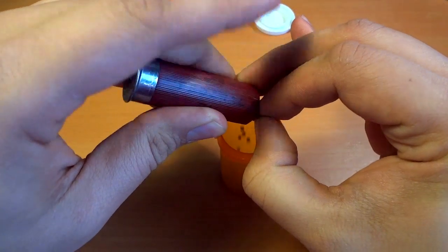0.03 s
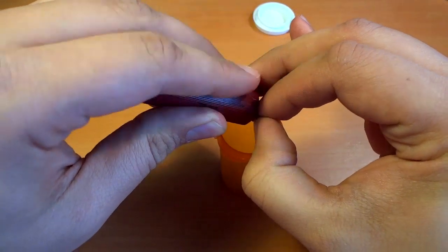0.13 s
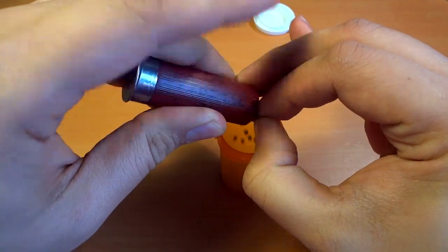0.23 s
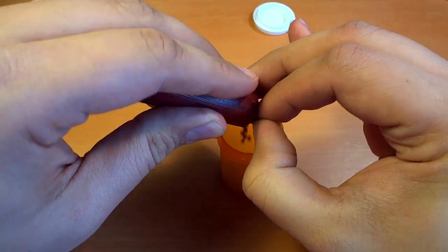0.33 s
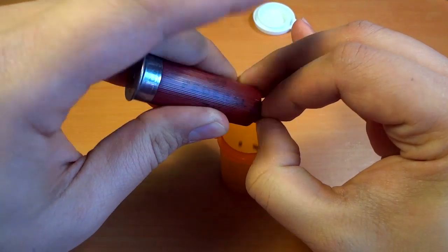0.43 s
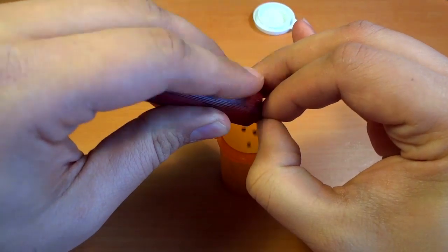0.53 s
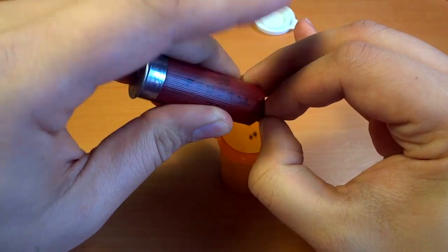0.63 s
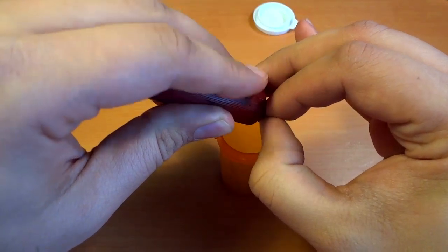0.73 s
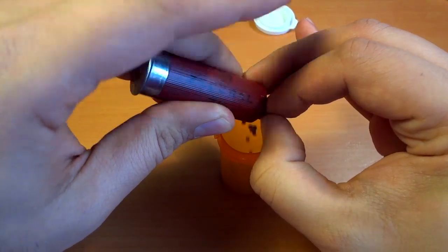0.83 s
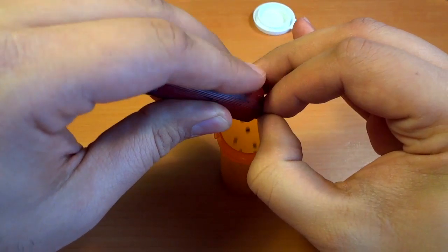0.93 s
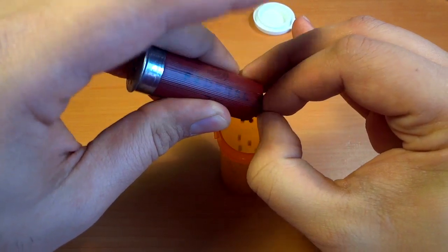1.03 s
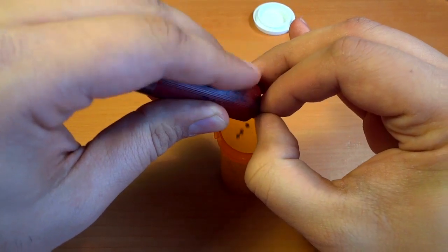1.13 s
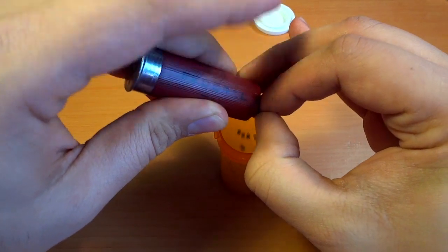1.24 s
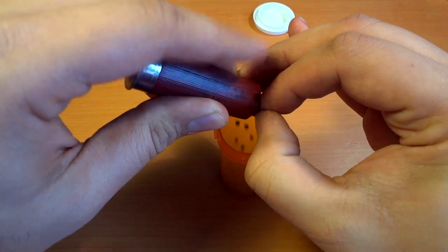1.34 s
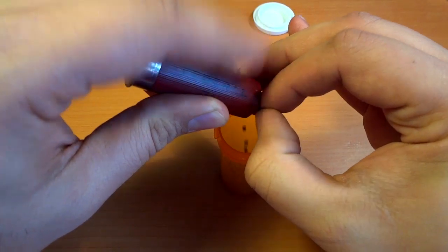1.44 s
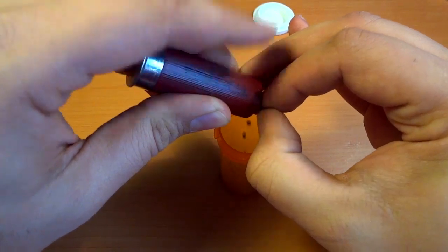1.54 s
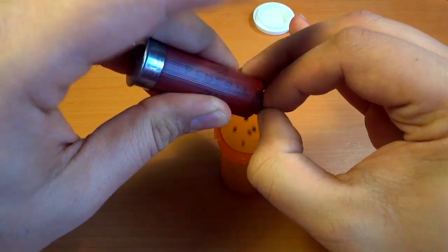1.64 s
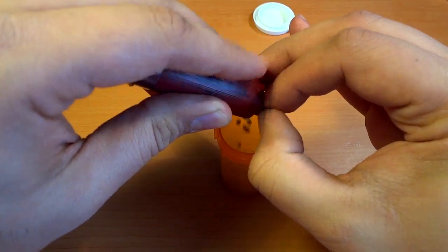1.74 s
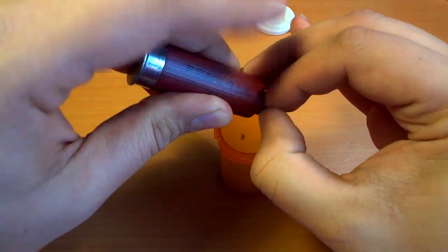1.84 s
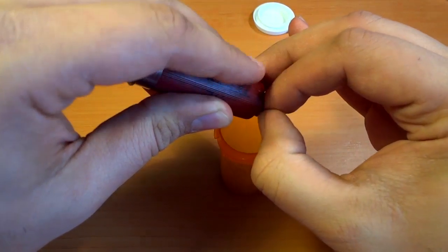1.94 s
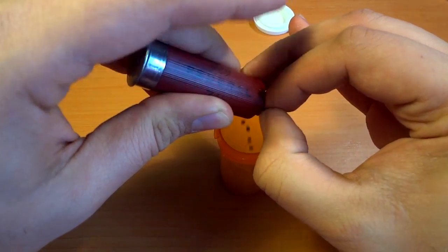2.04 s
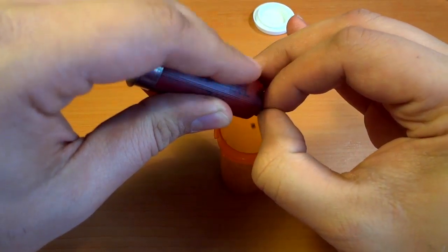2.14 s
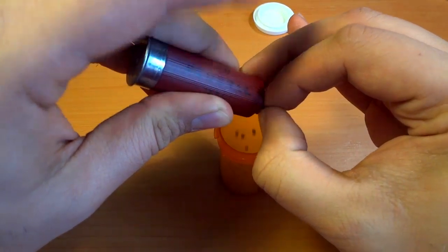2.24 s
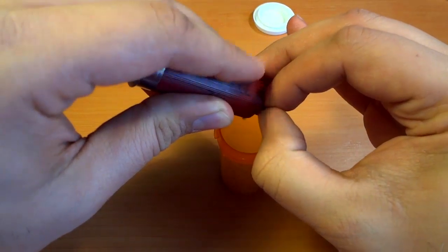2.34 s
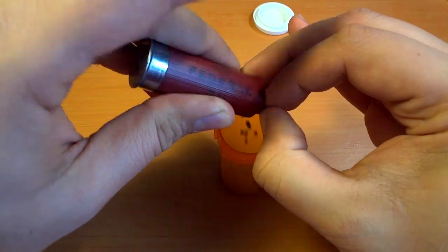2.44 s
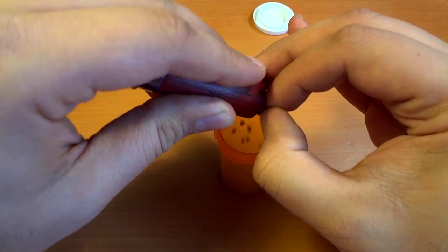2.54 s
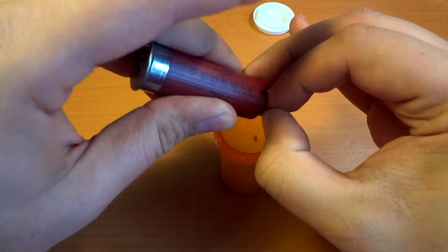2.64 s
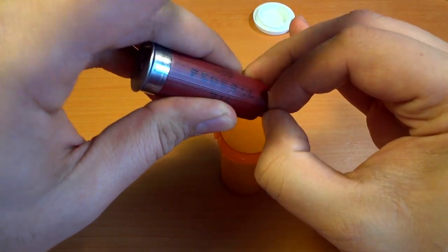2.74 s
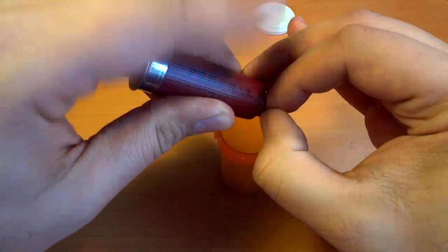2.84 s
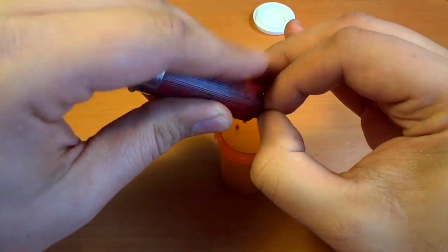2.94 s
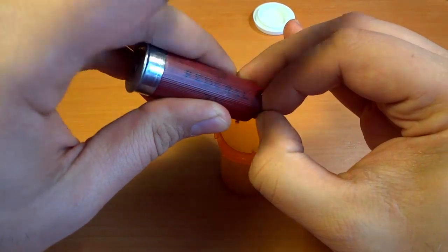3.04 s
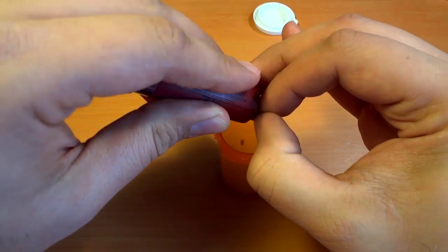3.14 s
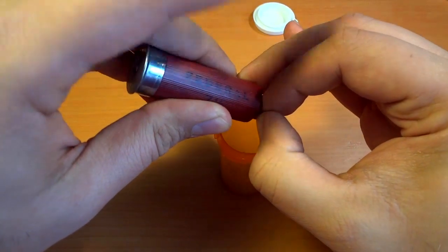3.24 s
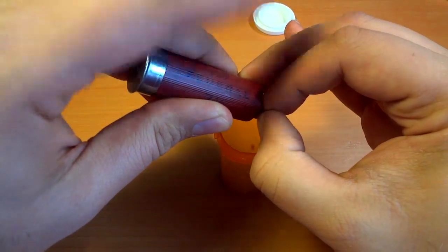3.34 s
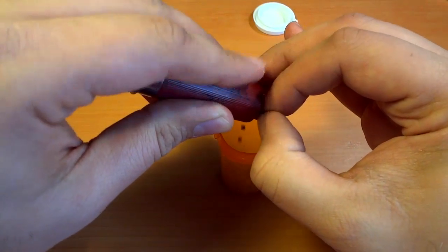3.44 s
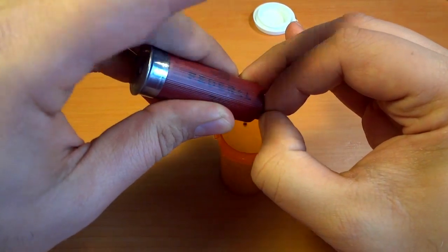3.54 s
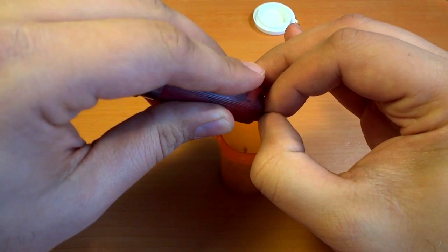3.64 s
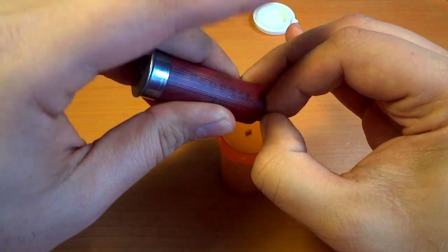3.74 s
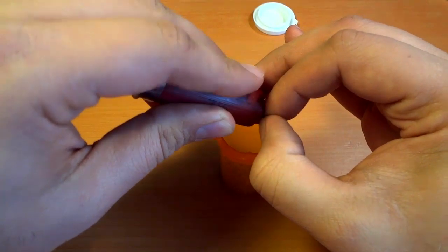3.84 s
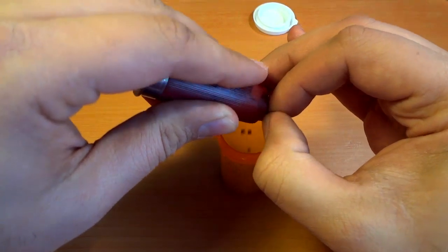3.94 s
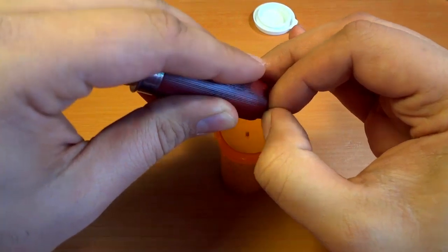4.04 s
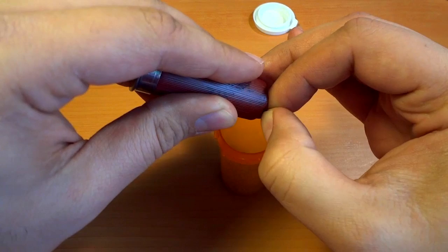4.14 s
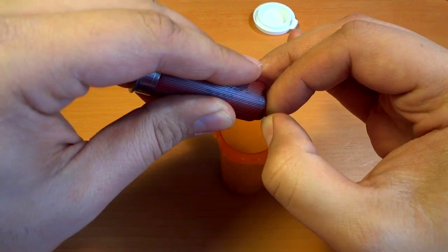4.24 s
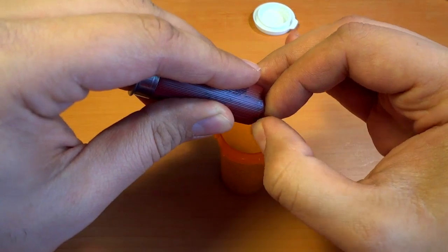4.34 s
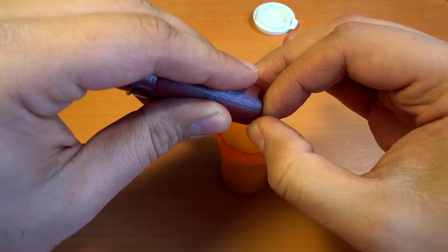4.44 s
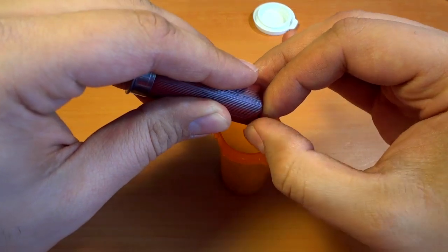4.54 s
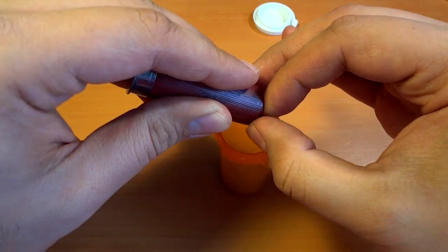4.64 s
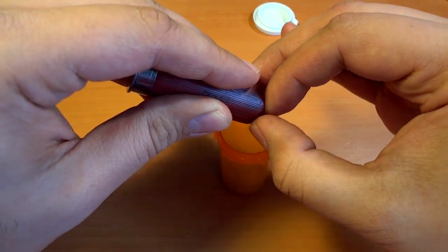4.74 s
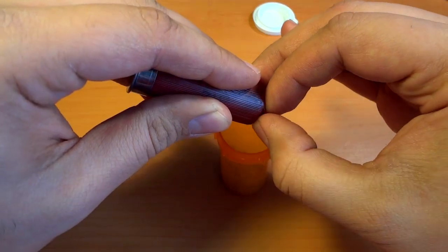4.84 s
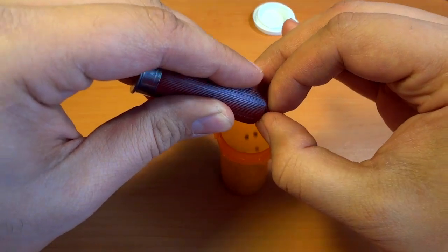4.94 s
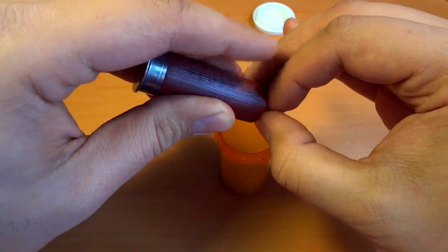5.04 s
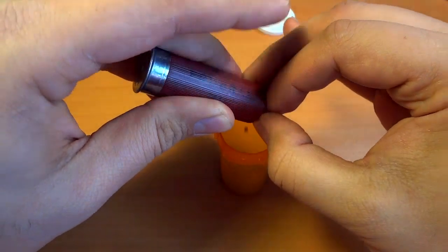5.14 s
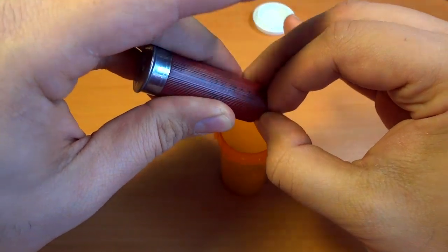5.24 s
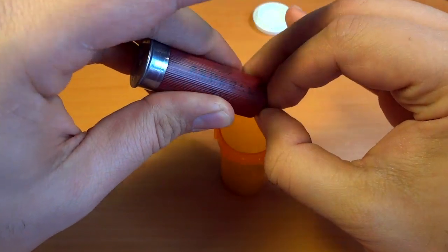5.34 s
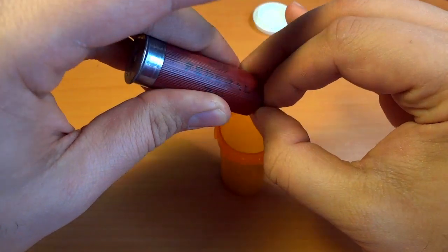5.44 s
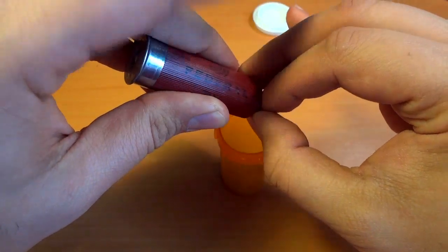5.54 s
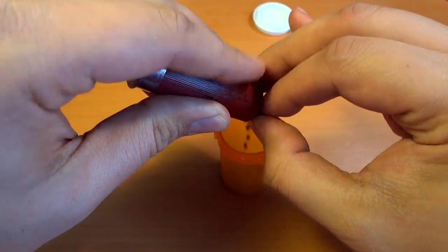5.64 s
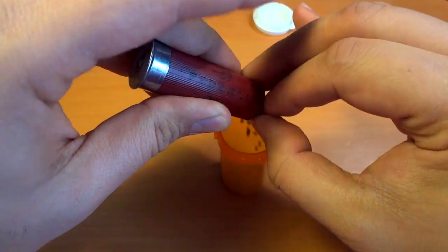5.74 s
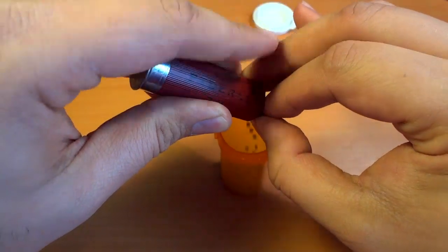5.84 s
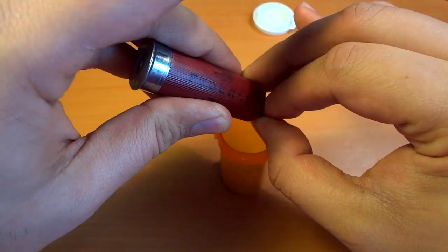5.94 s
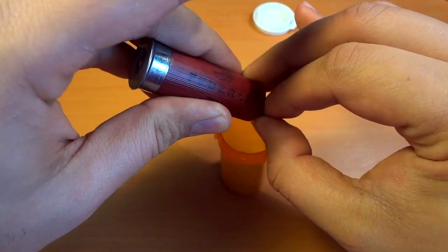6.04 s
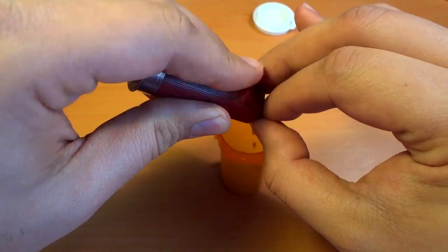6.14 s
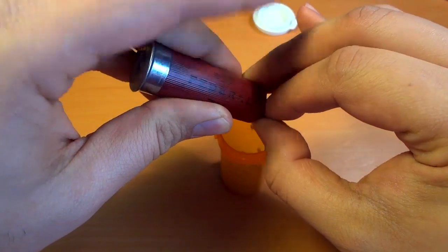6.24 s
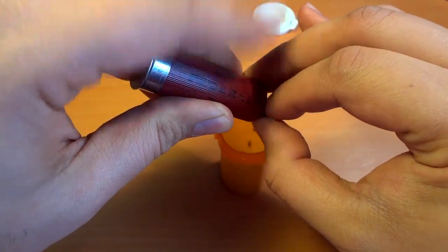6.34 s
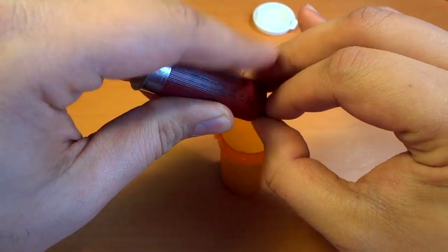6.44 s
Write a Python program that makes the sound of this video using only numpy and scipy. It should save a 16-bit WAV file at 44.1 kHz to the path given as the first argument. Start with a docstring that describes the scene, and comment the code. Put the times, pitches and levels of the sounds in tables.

```python
"""Lead shot pours out of a cut-open shotgun shell into a small plastic bottle, close to the microphone.
Each pellet is an impact: a click and a dying chain of contacts, filtered by the wall and bottom, then hops.
The bottle's air column rings with every landing, and the heap stiffens and damps the bottom as it grows.
A dense stream gives way to spurts and stray pellets; finger taps make the shot jump inside the shell.
Sparse decaying reflections form a small room, over low rumble and microphone hiss."""
import sys
import numpy as np
from scipy import signal
from scipy.fft import rfft, irfft
from scipy.io import wavfile

SR = 44100
rng = np.random.default_rng(int(sys.argv[2]) if len(sys.argv) > 2 else 0)


def generate_wav(sig):
    """Save sig (samples, or channels by samples) to the path in sys.argv[1] as 16-bit PCM at SR."""
    pcm = np.round(np.clip(np.atleast_2d(sig).T, -1, 1) * 32767).astype(np.int16)
    wavfile.write(sys.argv[1], SR, pcm)


N = 286209  # length in samples
SIZE = 2048  # length of a click or filter in samples


def amp(db):
    """Level law: decibels to amplitude gain."""
    return 10 ** (np.asarray(db) / 20)


def read(points, hz):
    """Interpolation: joins table points by straight lines on a log-frequency axis."""
    f, value = np.transpose(points)
    return np.interp(np.log(hz + 1), np.log(f), value)


def add(mix, s, sound):
    """Superposition: adds a sound to the mix at time s, cut off at the end."""
    start = max(round(s * SR), 0)
    part = mix[..., start:][..., :sound.shape[-1]]
    part += sound[..., :part.shape[-1]]


def causal(db):
    """Minimum phase: folding the cepstrum gives the promptest filters with these gains, as spectra."""
    cepstrum = irfft(np.log(amp(db)))
    cepstrum[..., 1:SIZE // 2] *= 2
    cepstrum[..., SIZE // 2 + 1:] = 0
    return np.exp(rfft(cepstrum))


def mode(hz, t60, db):
    """Free damped vibration: a sine that falls 60 dB in t60 seconds."""
    t = np.arange(SR // 3) / SR
    return amp(db - 60 * t / t60) * np.sin(2 * np.pi * hz * t)


def rung(modes):
    """Modal superposition: a struck body sounds as the sum of its damped modes."""
    return sum(mode(*row) for row in modes)


def clicks(colour_db, rattle_s, contacts_per_s, first, blur):
    """Impact chain: each row is a first contact and a dying run of random ones, filtered by its colour."""
    t = np.arange(SIZE) / SR
    shape = (len(colour_db), SIZE)
    contacts = rng.random(shape) < contacts_per_s / SR
    chain = rng.standard_normal(shape) * (blur + contacts) * np.exp(-t / rattle_s)
    chain[:, 0] = first
    sound = irfft(rfft(chain) * causal(colour_db))
    energy = (sound ** 2).sum(1, keepdims=True)
    return sound / np.sqrt(energy / (0.005 * SR))  # 0 dB if the energy is spread over 5 ms


def place(times, gains, sounds, spread):
    """Intensity stereo: lays sounds out in time, each with a random level difference between the sides."""
    mix = np.zeros((2, N))
    sides = spread * rng.standard_normal(len(times))
    for s, gain, sound, side in zip(times, gains, sounds, sides):
        add(mix, s, gain * np.outer([1 + side, 1 - side], sound))
    return mix


# Pellets leave in single file: timing scatter in shares of one gap, and strength scatter.
UNEVEN, SCATTER_DB = 0.3, 2.5


def trickle(runs):
    """Jittered pulse train: pellets follow one another unevenly while their level drifts along each run."""
    times, levels = [], []
    for start, length, number, db, change_db in runs:
        count = max(round(number), 1)
        late, force = rng.standard_normal((count, 2)).T
        along = np.clip((np.arange(count) + 0.5 + UNEVEN * late) / count, 0, 1)
        times.append(start + length * along)
        levels.append(db + change_db * along + SCATTER_DB * np.clip(force, -2, 1.5))
    return np.concatenate(times), np.concatenate(levels)


# Relative spectrum of the steady background: [f/Hz, level/dB]
HUSH_SPECTRUM = [(20, -10.5), (45, -7), (130, -8), (500, -5), (1500, -12), (7000, -19), (11000, -22)]
HUSH_DB, HUSH_CUT_HZ = -61, 11100  # overall level, frequency above which the background falls silent


def hush():
    """Partly coherent noise: rumble is most alike at both sides in the bass, under microphone hiss."""
    hz = np.fft.rfftfreq(N, 1 / SR)
    a, b = rfft(rng.standard_normal((2, N)))
    coherence = np.clip(read([(50, 0.49), (250, 0.083), (4000, 0.11)], hz), 0, 1)
    sides = np.array([a, coherence * a + np.sqrt(1 - coherence ** 2) * b])
    noise = irfft(sides * amp(read(HUSH_SPECTRUM, hz)) * (hz < HUSH_CUT_HZ), N)
    return amp(HUSH_DB) * noise / noise.std()


# Reverberation time of the room: [f/Hz, t60/s]
ROOM_DECAY = [(300, 0.04), (1100, 0.36), (3000, 0.31), (7000, 0.19), (11000, 0.28)]


def room(x):
    """Reverberation: random reflections from table, hands and walls decay at a rate set by frequency."""
    t = np.arange(SR // 2) / SR
    reflections = rng.standard_normal((2, SR // 2)) * (rng.random((2, SR // 2)) < 5000 / SR)
    reflections *= np.clip(t / 0.0035 - 0.5, 0, 1)  # silent at first, then rising to full density
    reflections = reflections + 0.2 * reflections[::-1]  # the sides share a little
    hz, frame_s, z = signal.stft(reflections, SR, nperseg=256)
    wet_db = read([(400, -5.5), (1100, -1.0), (3000, -4), (8000, -10.5)], hz)[:, None]
    faded = z * amp(-60 * frame_s / read(ROOM_DECAY, hz)[:, None])
    # the unfiltered decay of the left side sets unit energy
    scale = np.linalg.norm(signal.istft(faded, SR, nperseg=256)[1][0])
    tail = signal.istft(faded * amp(wet_db), SR, nperseg=256)[1] / scale
    return signal.fftconvolve(x, tail, axes=1)[:, :N]


# Finger taps on the shell, level before the gain of each sound they cause: [t/s, level/dB]
FINGER_TAPS = [(2.282, -55), (2.539, -52), (2.907, -55), (3.147, -49.5), (3.418, -47.5), (3.643, -53),
               (3.866, -47.5), (5.287, -61), (6.157, -63)]
# The shell knocks once on the rim: [t/s, level/dB]
RIM_KNOCK = (2.685, -36.5)
# Modes of the knocked rim, level relative to the knock: [f/Hz, t60/s, level/dB]
RIM_MODES = [(1734, 0.064, 7.5), (1884, 0.12, -11.5), (2780, 0.074, -3)]


def fingers():
    """Soft impact: fingertip thuds are short low-band noise bursts; one rim knock rings damped modes."""
    s, db = np.transpose(FINGER_TAPS)
    t = np.arange(SIZE) / SR
    band = signal.butter(1, [70, 420], "band", fs=SR, output="sos")
    bursts = rng.standard_normal((len(s), SIZE)) * np.exp(-t / 0.00494)
    thuds = signal.sosfilt(band, bursts)
    mix = place(s, amp(db + 8.0), thuds / abs(thuds).max(1, keepdims=True), spread=0.1)
    knock_s, knock_db = RIM_KNOCK
    add(mix, knock_s, amp(knock_db) * rung(RIM_MODES))
    return mix


# Single drops of shot inside the shell: [t/s, level/dB]
SHELL_DROPS = [(2.033, -32), (2.104, -31), (2.45, -29), (2.921, -32), (2.986, -37), (3.042, -38.5),
               (3.067, -36), (3.155, -29), (3.433, -31), (3.658, -27.5), (3.973, -26.5), (4.134, -34),
               (4.344, -51), (4.938, -34), (4.975, -39.5), (5.643, -31.5), (6.143, -42), (6.29, -33.5)]
# Shot sliding along the shell: [start t/s, length t/s, pellets, first level/dB, change by the end/dB]
SHELL_SLIDES = [(2.0, 0.098, 4, -36, -7), (5.66, .08, 4, -37, -5), (6.19, 0.055, 3, -47, 11.5)]
# Relative spectrum of clicks inside the shell: [f/Hz, level/dB]
SHELL_SPECTRUM = [(100, -22.5), (600, -31), (1500, -20), (2300, 2), (3000, -12.5), (4200, 2), (5400, -5),
                  (6800, -8), (8200, -2.5), (11000, -4)]
# Mean air note of the shell, level relative to each contact: [f/Hz, t60/s, level/dB]
SHELL_AIR = (2300, 0.056, -11)


def shell(falls_per_tap=4, waver=0.02):
    """Cavity resonance: sliding shot, and shot falling back after taps, excites a randomly varying air note."""
    tap_s, tap_db = np.repeat(FINGER_TAPS, falls_per_tap, axis=0).T
    fall_s = tap_s + rng.uniform(0.0034, 0.041, len(tap_s))
    fall_db = tap_db + 11 + 3 * rng.standard_normal(len(tap_s))
    s, db = np.hstack([np.transpose(SHELL_DROPS), trickle(SHELL_SLIDES), [fall_s, fall_db]])
    colour_db = np.tile(read(SHELL_SPECTRUM, np.fft.rfftfreq(SIZE, 1 / SR)), (len(s), 1))
    ticks = clicks(colour_db, rattle_s=0.0022, contacts_per_s=1900, first=2.1, blur=0.2)
    note_hz, t60, note_db = SHELL_AIR
    pitches_hz = note_hz * (1 + waver * rng.standard_normal(len(s)))
    notes = [mode(hz, t60, note_db) for hz in pitches_hz]
    return place(s, amp(db), ticks, spread=0.1) + place(s, amp(db), notes, spread=0.192)


# Pellets that land hard or alone, plus a few faint dull clicks from inside the shell (near 2.91, 4.91, 5.63 and
# 6.16 s) played the same way; dullness means more knock of plastic, less tick of metal: # [t/s, level/dB,
# dullness/dB]
HARD_LANDINGS = [(.0036, -15.5, -9), (0.0315, -16.5, 3), (0.0534, -17, -6), (.1405, -14.5, -4.5),
                 (0.1642, -16, -2.5), (.2678, -19.5, 5), (.302, -27.5, -3.5), (0.3402, -17.5, 1.5),
                 (0.3985, -18.5, -2), (0.4488, -15, -6), (0.5171, -16, -6), (.609, -14.5, -5.5),
                 (.66, -15.5, 0.5), (0.6851, -18.5, 10.5), (0.7133, -17, -1.5), (0.7648, -16.5, 8.5),
                 (0.8052, -19.5, -1), (0.8267, -19.5, 7), (0.9039, -15.5, -4), (0.9554, -15, 4),
                 (1.0974, -17.5, -11), (1.144, -16.5, 4), (1.3627, -17, 6.5), (1.405, -14, 4),
                 (1.4764, -16, 6.5), (1.5029, -15, 9), (1.561, -15, 2), (1.6348, -17.5, 1),
                 (1.7188, -14, -2), (1.7685, -16.5, 9.5), (1.8122, -15, 8), (1.92, -16.5, 5),
                 (1.967, -20.5, 9.5), (1.978, -20, -21.5), (2.0513, -31.5, -9.5), (2.121, -20, 5),
                 (2.1722, -16.5, -5), (2.2476, -16.5, 4), (2.2812, -20.5, 14), (2.3212, -21, 6.5),
                 (2.3466, -18.5, 5), (2.392, -18, 8), (2.4532, -19.5, -21.5), (2.502, -15.5, -5.5),
                 (2.561, -17, -2.5), (2.5808, -15, -3), (2.6135, -14.5, 2.5), (2.6632, -16, 8),
                 (2.6835, -17, 2.5), (2.7508, -20.5, 5.5), (2.8008, -21, 3), (2.909, -29, 10),
                 (2.9682, -33.5, 2), (3.0797, -24.5, 4), (3.114, -16.5, 0.5), (3.1972, -24, 12),
                 (3.259, -20.5, -10), (3.292, -21, 2), (3.4186, -29, 17), (3.4447, -22.5, 4),
                 (3.4536, -20, 5), (3.5171, -19, 10), (3.5779, -18.5, -12), (3.5995, -21, 10),
                 (3.645, -28, -6), (3.6869, -17.5, -4.5), (3.7406, -18, 8.5), (3.8196, -21, 9),
                 (3.8717, -17, -1), (3.9035, -23, 10), (3.9341, -19.5, 10.5), (4.0016, -23, 4),
                 (4.0298, -16, 4), (4.0766, -20.5, 14.5), (4.1187, -17, 9), (4.178, -20.5, -2.5),
                 (4.2245, -27, 3.5), (4.913, -28.5, 9), (5.0222, -24, 1), (5.046, -27.5, 6),
                 (5.0728, -19.5, 6), (5.0821, -24, 8), (5.1088, -19, 1), (5.1588, -22, 10),
                 (5.245, -21, -3), (5.2838, -22.5, -1), (5.3279, -24, -16), (5.626, -31, 11),
                 (5.7415, -25, 16), (5.7672, -18, -10), (5.813, -16.5, -3), (5.866, -15, 2),
                 (5.911, -16, -18), (5.9642, -18, -11), (5.9986, -19.5, -0.5), (6.159, -31.5, 10),
                 (6.2407, -24.5, 2), (6.2684, -24.5, 7), (6.3459, -26.5, 6), (6.4062, -19, -5.5),
                 (6.454, -24, -3), (6.4826, -24.5, 0)]
# Surges of shot out of the shell: [start t/s, length t/s, pellets, first level/dB, change by the end/dB]
STREAM_SURGES = [(.01, .235, 15, -17.5, -7), (.345, 0.25, 22, -19, -3.5), (.615, 0.29, 14, -22, -7),
                 (.93, 0.55, 48, -19.5, -0.5), (1.51, 0.43, 32, -20.5, 2), (2.125, 0.086, 7, -19.5, -5.5),
                 (2.31, 0.073, 5, -19.5, 0.5), (2.51, .2, 14, -19.5, -3), (3.095, 0.063, 5, -19.5, -6),
                 (3.535, 0.039, 2, -22.5, 3), (3.86, .025, 2, -24.5, 0), (4.038, 0.042, 2, -25, 4.5),
                 (5.752, 0.2, 21, -20.5, -3), (5.97, .05, 3, -23.5, -7.5), (6.355, 0.071, 5, -26.5, -1)]
DULL_DB, DULL_SCATTER_DB = 1.5, 5.5  # dullness of the stream
# Stream pellets this close to a hard landing only glance off.
CLEAR_S, GLANCE_DB = 0.0047, -9


def landings():
    """Point process: hard landings and the stream between them, as times, levels and dullness."""
    hard_s, hard_db, hard_dull_db = np.transpose(HARD_LANDINGS)
    s, db = trickle(STREAM_SURGES)
    apart_s = abs(s[:, None] - hard_s).min(1)
    db = db + GLANCE_DB * np.exp(-(apart_s / CLEAR_S) ** 2)
    dull_db = DULL_DB + DULL_SCATTER_DB * rng.standard_normal(len(s))
    return np.r_[hard_s, s], np.r_[hard_db, db], np.r_[hard_dull_db, dull_db]


# Pitch of the bare bottom, and its rise when all the shot is in.
BOTTOM_HZ, STIFFEN_HZ, STIFFEN_CURVE = 4225, 1480, 0.67
# Bottle thud on the table: level relative to the landing when empty, and gain when full.
THUD_DB, THUD_GAIN_DB = -25, 33.5


def heap(s):
    """Mass, stiffness and damping: each pellet raises the bottom's pitch, damps it and weighs it down."""
    full = np.argsort(np.argsort(s)) / len(s)  # share of the shot already landed

    def damped(deep_db, bare_db, share):
        """Exponential damping from the bare level towards the level under a deep heap."""
        return deep_db + bare_db * np.exp(-full / share)

    bottom_hz = BOTTOM_HZ + STIFFEN_HZ * full ** STIFFEN_CURVE
    boom_db = damped(deep_db=-3.5, bare_db=19.6, share=0.46)
    air_db = damped(deep_db=-6, bare_db=5.1, share=0.19)
    return bottom_hz, boom_db, air_db, THUD_DB + THUD_GAIN_DB * full


# Air column of the bottle, closed at one end; pitch it settles to, level relative to the blow:
# [f/Hz, t60/s, level/dB]
BOTTLE_AIR = (1168, 0.096, -19.5)


def air_column(times, db, waver=0.02, unsure_db=2):
    """Air-column resonance: every blow sounds the air, whose note creeps up as the bottle fills."""
    note_hz, t60, note_db = BOTTLE_AIR
    detune, force = rng.standard_normal((len(times), 2)).T
    pitch_hz = note_hz * (1 - 0.04 * np.exp(-times / 0.99) + waver * detune)
    notes = [mode(hz, t60, note_db) for hz in pitch_hz]
    cushion_db = 0.76 * np.clip(db + 30.5, -12, 0)  # the heap soaks up light touches
    gains = amp(db + cushion_db + unsure_db * force)
    return place(times, gains, notes, spread=0.05) * amp([[-1.5], [1.5]])


# Relative spectrum of a landing: [f/Hz, level/dB]
LANDING_SPECTRUM = [(100, -79), (450, -38.5), (750, -25.5), (1400, -29.5), (1750, -16.5), (2650, -15),
                    (3200, -2.5), (4400, -9), (5600, -0.5), (7000, -0.5), (9000, 2.5), (11000, -0.5)]
# Peaks and hollows of the plastic wall: [f/Hz, half width f/Hz, level/dB]
WALL_RESONANCES = [(3251, 88, -12.5), (3380, 55, 7.5), (6180, 320, 5), (6435, 106, -7), (7280, 440, 6),
                   (7860, 120, -6.5), (8960, 297, 5.5), (9900, 93, -2), (10710, 280, 4)]
# Bottle standing on the table, level relative to the thud: [f/Hz, t60/s, level/dB]
STANDING_MODES = [(296, 0.12, -59.5), (462, 0.039, -39), (860, 0.06, -45)]


def pellets(hop_count=6):
    """Impact and rebound: landings and hops are coloured by the wall and the heap-laden bottom."""
    s, db, dull_db = landings()
    bottom_hz, boom_db, air_db, thud_db = heap(s)
    hz = np.fft.rfftfreq(SIZE, 1 / SR)
    wall_db = sum(peak_db / (1 + ((hz - f) / width) ** 2) for f, width, peak_db in WALL_RESONANCES)
    bottom_db = boom_db[:, None] / (1 + ((hz - bottom_hz[:, None]) / 700) ** 2)
    # gain in dB for each dB of dullness
    dull_weight = read([(900, 0.79), (3000, 0.88), (4800, 0.87), (7500, 0.37)], hz)
    colour_db = read(LANDING_SPECTRUM, hz) + wall_db + bottom_db + dull_db[:, None] * dull_weight
    cracks = clicks(colour_db, rattle_s=0.0029, contacts_per_s=2400, first=1.69, blur=0.15)
    mix = place(s, amp(db), cracks, spread=0.085)
    mix = mix + air_column(s, db + air_db + 0.3 * dull_db)
    mix = mix + place(s, amp(db + thud_db), [rung(STANDING_MODES)] * len(s), spread=1.0)
    # hops are stronger on the bare bottom than on the heap
    at, hop_db = s, db - 16.5 + 1.06 * np.clip(boom_db, 0, 8)
    for _ in range(hop_count):
        at = at + rng.uniform(0.003, 0.013, len(s))
        hops = clicks(colour_db, rattle_s=0.0018, contacts_per_s=5500, first=1.8, blur=0.21)
        hop_gains = amp(hop_db + 1.2 * rng.standard_normal(len(s)))
        mix = mix + place(at, hop_gains, hops, spread=0.074)
        mix = mix + air_column(at, hop_db + air_db - 3.5)
        hop_db = hop_db - 1.6
    return mix


def scene():
    """Superposition: close sources, slightly to the right, with their reverberation and the background."""
    near = (pellets() + shell() + fingers()) * amp([[-0.3], [0.3]])
    return near + room(near) + hush()


# Steep upper band limit: [f/Hz, gain/dB]
BAND_LIMIT = [(10900, 0), (11050, -4), (11280, -19), (12000, -36), (13000, -52), (15000, -68),
              (17000, -100)]


def record(dry):
    """Linear filtering: a minimum-phase low-pass removes the top of the treble."""
    edge = irfft(causal(read(BAND_LIMIT, np.fft.rfftfreq(SIZE, 1 / SR))))
    return signal.oaconvolve(dry, edge[None], axes=1)[:, :N]


dry = scene()
out = record(dry)
generate_wav(out)
```